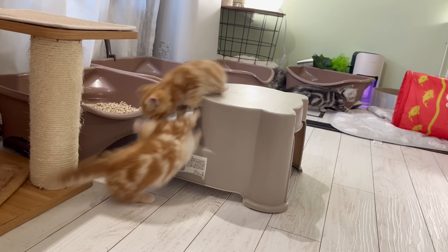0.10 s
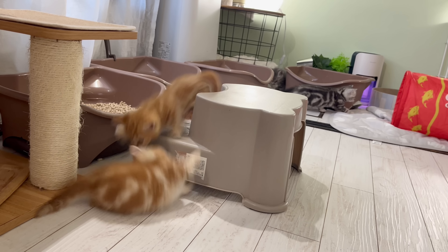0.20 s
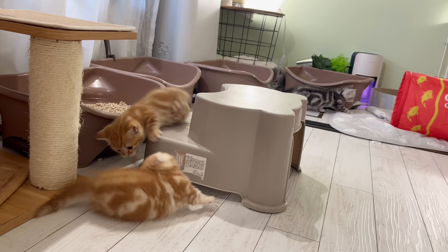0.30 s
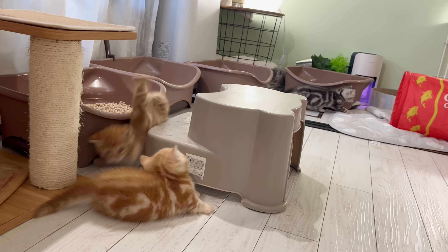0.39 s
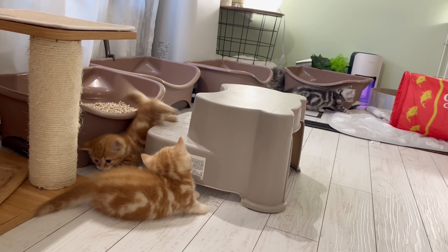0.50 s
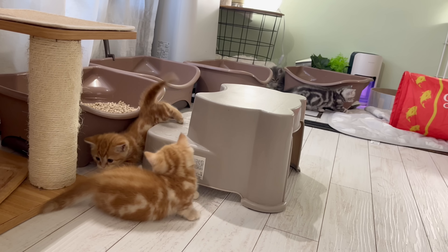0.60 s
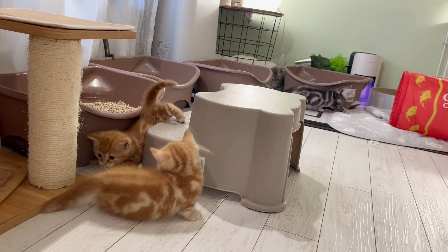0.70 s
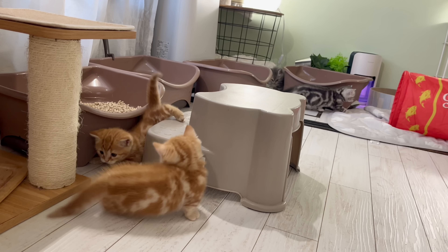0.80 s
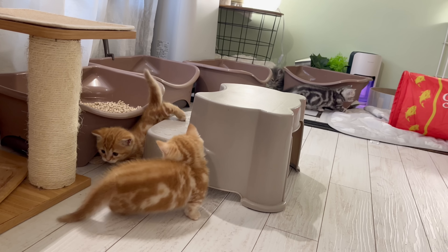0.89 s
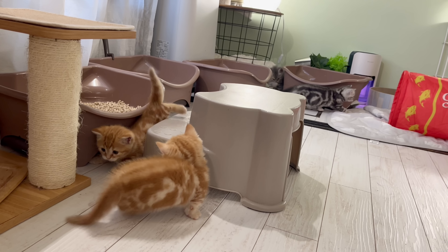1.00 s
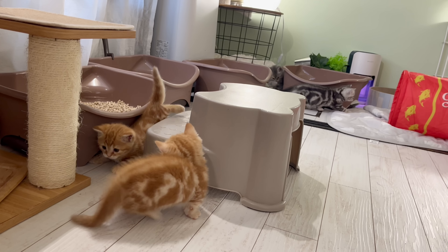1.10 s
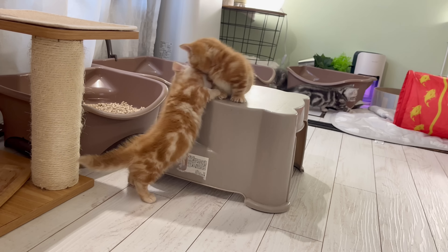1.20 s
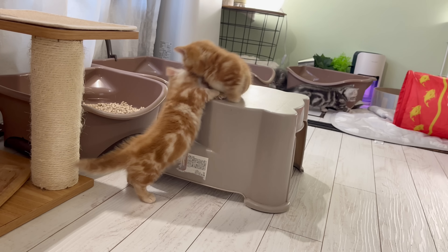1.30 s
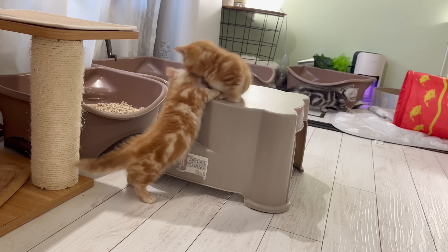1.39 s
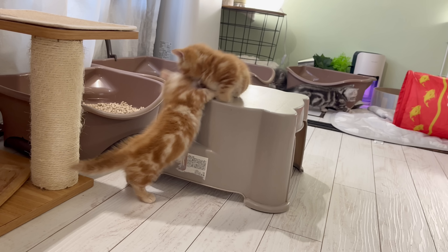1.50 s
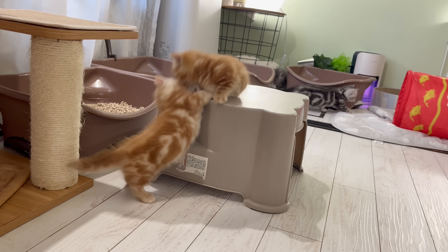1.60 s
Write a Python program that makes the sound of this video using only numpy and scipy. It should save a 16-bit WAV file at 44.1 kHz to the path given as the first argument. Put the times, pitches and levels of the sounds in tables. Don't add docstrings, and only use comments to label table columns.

```python
import sys
import numpy as np
from scipy import signal
from scipy.fft import rfft, irfft
from scipy.io import wavfile
from scipy.ndimage import uniform_filter1d

SR = 44100
rng = np.random.default_rng(int(sys.argv[2]) if len(sys.argv) > 2 else 0)


def log_audio(samples):
    frames = np.atleast_2d(samples).T
    limited = np.clip(frames, -1, 1)
    pcm = np.round(limited * 32767).astype(np.int16)
    wavfile.write(sys.argv[1], SR, pcm)


def volts_from_db(level):
    exponent = np.asarray(level, float) / 20
    return 10 ** exponent


N = 70560
HZ = np.maximum(np.fft.rfftfreq(2 * N, 1 / SR), 1)
LEAD_S = 0.13


def over_hz(table):
    hz, value = np.array(table).T
    return np.interp(np.log(HZ), np.log(hz), value)


def colour(x, gain):
    return irfft(rfft(x, 2 * N) * gain)[..., :N]


def place(start_s):
    replay_starts_s, goes_back_s = REPLAY[0]
    if start_s > replay_starts_s:
        start_s = start_s - goes_back_s
    return int((start_s + LEAD_S) * SR)


def ring(modes):
    t = np.arange(int(0.6 * SR)) / SR
    return sum(volts_from_db(db - 60 * t / t60) * np.sin(2 * np.pi * hz * t) for hz, db, t60 in modes)


def blows(table, partials, rise_s):
    out = np.zeros(2 * N)
    for start_s, level_db, pitch_hz, t60_s in table:
        tone = ring([(pitch_hz * ratio, rel_db, t60_s / ratio) for ratio, rel_db in partials])
        swell = 1 - np.exp(-np.arange(len(tone)) / (rise_s(pitch_hz) * SR))
        first = place(start_s)
        out[first:first + len(tone)] -= volts_from_db(level_db) * tone * swell
    return out[:N]


# pitch_hz, likeness
LIKENESS = [(60, .98), (300, .9), (800, .6), (1500, .2), (5000, .4), (7800, -.95), (9300, -.9),
            (11500, .95)]


def pair():
    likeness = np.clip(over_hz(LIKENESS), -1, 1)
    mid = colour(rng.standard_normal(N), np.sqrt((1 + likeness) / 2))
    side = colour(rng.standard_normal(N), np.sqrt((1 - likeness) / 2))
    return np.array([mid + side, mid - side])


# pitch_hz, level_db (per Hz)
AIR_TONE = [(25, -36), (71, -2), (200, -8.5), (400, -7), (2080, -17), (6500, -45), (9500, -45.5),
            (14000, -56)]


def air():
    level_db = -59
    mic_db = over_hz(MIC)
    noise = colour(pair(), volts_from_db(over_hz(AIR_TONE) - mic_db))
    waver_db = 0.5 * 60 * uniform_filter1d(rng.standard_normal(N), size=4000)
    heard_level = colour(noise, volts_from_db(mic_db)).std()
    return noise * volts_from_db(level_db + waver_db) / heard_level


# pitch_hz, level_db, t60_s
ROOM = [(60, -12.5, 0.83), (292, -1.5, 0.17), (1080, 3.5, 0.58), (3100, -0.5, 0.23), (6000, -6, 0.27),
        (11300, -12.5, 0.53)]


def room(x):
    gap_s = 0.0012
    t, noise, tail = np.arange(N) / SR, pair(), 0
    table = np.array(ROOM)
    level_db, t60_s = over_hz(table[:, [0, 1]]), over_hz(table[:, [0, 2]])
    for hz in 45 * 2 ** np.arange(9):
        decay = volts_from_db(-60 * t / t60_s[np.searchsorted(HZ, hz)])
        fade = decay * np.clip(t / gap_s - 1, 0, 1)
        octaves_off = np.clip(np.log2(HZ / hz), -1, 1)
        band = np.cos(np.pi / 2 * octaves_off) ** 2
        tail = tail + colour(noise, band * volts_from_db(level_db)) * fade / np.sqrt(np.sum(fade ** 2))
    return signal.fftconvolve(x[None], tail)[:, :N]


# start_s, level_db, pitch_hz, t60_s
THUDS = [(.039, -31, 97.5, 0.11), (.05, -42.5, 71, 0.41), (.126, -43, 66.9, 0.93), (.168, -51, 64, 0.13),
         (.242, -17.5, 67.3, 0.15), (.236, -27.5, 132.7, 0.16), (.266, -25.5, 129.6, 0.13),
         (.274, -28.5, 107.4, 0.17), (.306, -24, 88, 0.1), (.31, -65, 64.5, 0.04), (.354, -69, 98.6, 0.16),
         (.373, -38.5, 99.6, 0.17), (.438, -29, 92.6, 0.1), (.46, -39.5, 148.5, 0.28),
         (.472, -40.5, 91, 0.17), (.492, -32.5, 118, 0.062), (.508, -28, 63.4, 0.12),
         (.543, -36, 94.3, 0.13), (.595, -69, 110, 0.069), (.685, -42.5, 60, 0.089), (.79, -53.5, 82, 0.15),
         (.83, -50.5, 56.6, 0.16), (1.171, -38.5, 73.5, 0.076), (1.2, -42, 67, 0.12),
         (1.226, -44.5, 66.4, 0.41), (1.257, -62, 68.4, 0.15)]


def thuds():
    rise_cycles = 0.61
    return blows(THUDS, [(1, -2), (1.7, -26), (2.18, -10.5)], lambda hz: rise_cycles / hz)


# start_s, level_db, pitch_hz, t60_s
KNOCKS = [(.0315, -34, 275.5, 0.032), (.208, -32, 525, 0.017), (.2108, -31.5, 361, 0.021),
          (.2293, -25, 425, 0.048), (.2345, -29, 384, 0.065), (.23, -31, 695, 0.057), (.25, -33, 245, 0.17),
          (.256, -37.5, 920, 0.032), (.17, -39.5, 204, 0.022), (.342, -33.5, 650, 0.013),
          (.35, -46.5, 275, 0.076), (.4298, -41.5, 812, 0.036), (.4355, -40, 300, 0.062),
          (.44, -38.5, 206, 0.086), (.4565, -35.5, 817, 0.033), (.4562, -41, 390, 0.03),
          (.469, -42.5, 773, 0.025), (.484, -38.5, 187, 0.077), (.548, -57, 520, 0.048),
          (.577, -47, 560, 0.026), (.6415, -45.5, 490, 0.017), (1.19, -66, 184, 0.22),
          (1.21, -57, 261, 0.091), (1.228, -55.5, 216, 0.04), (1.242, -47, 336, 0.062),
          (1.262, -52, 218, 0.07), (1.2802, -42, 760, 0.035)]
# pitch_ratio, level_db
KNOCK_PARTIALS = [(1, 0), (.84, -15), (1.16, -14), (1.6, -22)]


def knocks():
    return blows(KNOCKS, KNOCK_PARTIALS, lambda hz: 0.0007)


# start_s, level_db, pitch_hz, t60_s
TICKS = [(.161, -51, 2710, .06), (.174, -52, 4380, .02), (.2252, -24, 2230, 0.019),
         (.2254, -25, 4690, .015), (.2256, -37, 3520, 0.013), (.2254, -31.5, 1728, 0.023),
         (.2254, -25, 6160, 0.019), (.2278, -35, 2170, 0.011), (.2332, -32.5, 2100, 0.015),
         (.234, -29.5, 2704, 0.033), (.231, -33, 4720, 0.021), (.2445, -32.5, 4720, .04),
         (.2535, -38.5, 4770, 0.024), (.277, -44, 4830, .06), (.4525, -43, 4580, 0.023),
         (.471, -53, 2250, 0.018), (.471, -45, 3220, 0.018), (.485, -41, 2285, 0.022),
         (.483, -42, 1420, 0.027), (.494, -44, 1210, 0.023), (.503, -43, 1400, 0.022),
         (.502, -47.5, 3100, 0.0098), (.547, -42.5, 2740, 0.012), (.573, -49, 2220, .015),
         (1.2065, -42.5, 1490, 0.023), (1.2105, -42.5, 2644, 0.041), (1.209, -46.5, 3100, 0.04),
         (1.211, -42.5, 6500, 0.022), (1.212, -45, 4630, 0.021), (1.2105, -46, 4820, .03),
         (1.213, -44, 4280, .025), (1.218, -47, 3810, 0.046), (1.228, -51, 3390, .05),
         (1.285, -60, 1150, 0.013), (1.289, -51, 1870, .015), (1.293, -52, 2200, 0.012)]


def ticks():
    return blows(TICKS, [(1, 0.018)], lambda hz: 0.00035)


# start_s, level_db, length_s, brightness_hz, shell_ring_db
CLAWS = [(-0.01, -64.5, 0.11, 3760, -37), (0.116, -55.5, 0.019, 3900, -23), (0.148, -45.5, 0.023, 3830, 0),
         (0.1708, -41.5, 0.0054, 5340, -36), (0.178, -54, 0.032, 3930, -27),
         (0.2246, -30, 0.0034, 5300, -27), (0.2251, -26.5, 0.0056, 2440, -36),
         (0.234, -30, 0.0039, 2600, 1), (0.235, -41.5, 0.025, 4670, 2), (0.25, -46, 0.046, 4220, -26),
         (0.37, -63, 0.11, 4150, -27), (0.428, -57, 0.0012, 4200, -15), (0.4511, -45, 0.0044, 4700, -9),
         (0.46, -47, 0.012, 2260, 2), (0.475, -50.5, 0.017, 2480, -20), (0.494, -50, 0.018, 1510, -12),
         (0.501, -60, 0.082, 2430, -37), (.546, -54.5, 0.0027, 3500, -11), (0.554, -61, 0.013, 1960, -20),
         (0.787, -72.5, 0.038, 6000, 1), (1.035, -74.5, 0.022, 7000, -32), (1.192, -60.5, 0.014, 3200, -27),
         (1.2042, -43.5, 0.0074, 4250, -25), (1.21, -47.5, 0.038, 3980, -12.5),
         (1.278, -52, 0.015, 1260, -19.5), (1.295, -53, 0.012, 1900, -30)]
# pitch_hz, level_db, t60_s
SHELL = [(1235, 0, 0.032), (2195, -10.5, 0.015), (2546, -22.5, 0.14), (2650, -28, 0.073),
         (3220, -10.5, 0.0053), (3650, -24, 0.037), (4340, -14, 0.01), (4720, -7, 0.016),
         (5230, -15.5, 0.01), (5120, -10, 0.053), (5300, -29, 0.016)]


def scratches():
    slips_per_s, scatter_db = 9000, 1.3
    width, low_cut = 0.94, 0.68
    rise_share, quick_s = 0.5, 0.03
    slips = (rng.random(N) < slips_per_s / SR) * rng.uniform(-1, 1, N)
    slips = slips * volts_from_db(scatter_db * 8.1 * uniform_filter1d(rng.standard_normal(N), size=50))
    bare, struck = np.zeros(N), np.zeros(N)
    for start_s, level_db, length_s, bright_hz, ring_db in CLAWS:
        t = np.arange(int((length_s + 0.27) * SR)) / SR
        rise_s = min(rise_share, length_s / quick_s) * length_s
        fade_s = 0.0002 + 0.53 * length_s
        shape = np.minimum(t / rise_s, 1) * np.exp(-np.maximum(t - length_s, 0) / fade_s)
        first = place(start_s)
        span = slice(first, first + len(t))
        rasp = signal.lfilter(*signal.iirpeak(bright_hz, 1 / width, SR), slips[span])
        rasp = signal.lfilter(*signal.butter(2, low_cut * bright_hz, "high", fs=SR), rasp)
        stroke = shape * rasp / rasp.std()
        bare[span] += volts_from_db(level_db - 4.5) * stroke
        struck[span] += volts_from_db(level_db - 7.5 + ring_db) * stroke
    shell = ring(SHELL)
    shell = shell / np.sqrt(np.sum(shell ** 2))
    return bare + signal.fftconvolve(struck, shell)[:N]


def crack():
    start_s, level_db, samples, fade_samples = 0.2248, -23, 60, 15
    out, first = np.zeros(N), place(start_s)
    burst = np.diff(rng.standard_normal(samples + 1))
    out[first:first + samples] = volts_from_db(level_db) * burst * np.exp(-np.arange(samples) / fade_samples)
    return out


# start_s, goes_back_s
REPLAY = [
    (1.168, 1.2874),
    (1.287, 1.3849),
    (1.405, 1.4658),
    (1.525, 1.5762),
]


def replay(x):
    splice_s = 0.008
    i, lead = np.arange(N), int(LEAD_S * SR)
    out = x[:, np.minimum(i + lead, N - 1)]
    for start_s, back_s in REPLAY:
        fade = np.clip((i / SR - start_s) / splice_s + 0.5, 0, 1)
        piece = x[:, np.clip(i + lead - round(back_s * SR), 0, N - 1)]
        out = out * (1 - fade) + fade * piece
    return out


# pitch_hz, level_db
LEFT_DB = [(60, 1.5), (500, 2), (1500, 3), (3000, 11), (5000, 10), (8000, -1.5), (12000, -0.5)]
# pitch_hz, lead_radians
LEFT_LEADS = [(100, 0.15), (1200, 0.87), (3000, 0.34), (6000, 1.13), (7800, 2.5), (9300, 2.42),
              (11500, 0.11), (14500, 2.1)]


def scene():
    shell_blows = knocks() + ticks()
    rest = thuds() + scratches() + crack()
    half, turn = volts_from_db(over_hz(LEFT_DB) / 2), np.exp(0.5j * over_hz(LEFT_LEADS))
    ports = np.array([half, 1 / half])
    direct = colour(shell_blows + rest, ports * [turn, 1 / turn])
    tail = colour(room(volts_from_db(-5) * shell_blows + rest), np.sqrt(ports))
    return replay(direct + tail + air())


def top_cut(x):
    return signal.sosfilt(signal.butter(12, 15800, fs=SR, output="sos"), x)


# pitch_hz, level_db
MIC = [(30, 0.5), (70, 4.5), (7800, -6.5), (9300, -10.5), (10300, -8.5), (13600, -11.5), (14600, -30),
       (16500, -36)]


def record(dry):
    mix = colour(dry, volts_from_db(over_hz(MIC)))
    return top_cut(mix)


dry = scene()
out = record(dry)
log_audio(out)
```